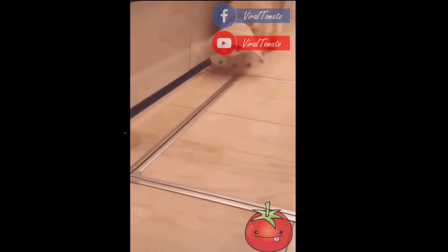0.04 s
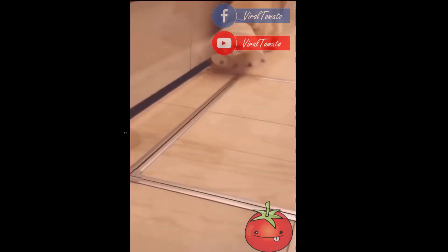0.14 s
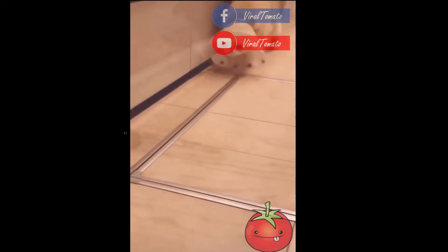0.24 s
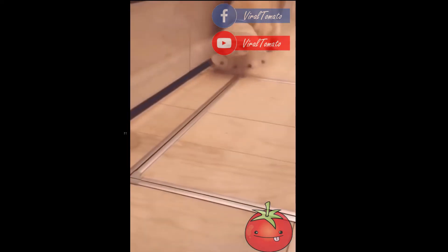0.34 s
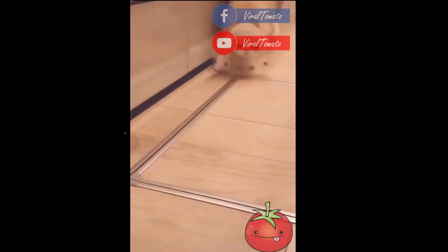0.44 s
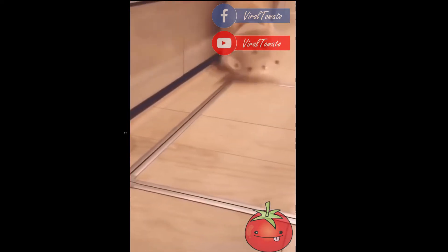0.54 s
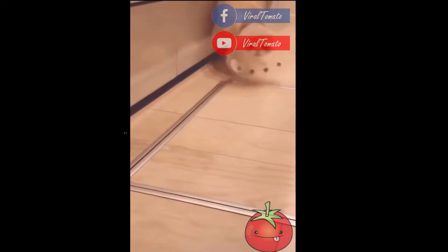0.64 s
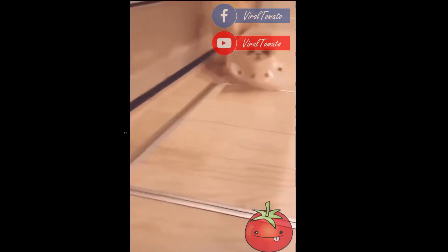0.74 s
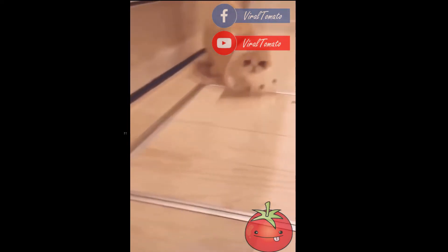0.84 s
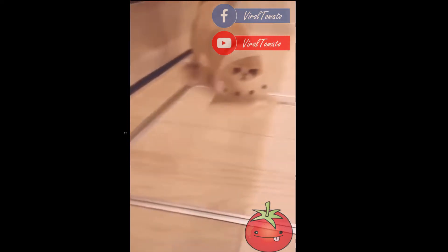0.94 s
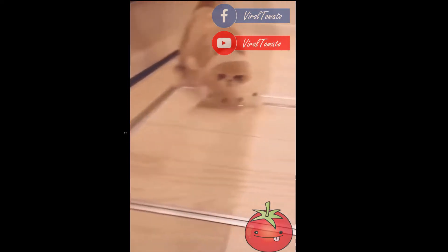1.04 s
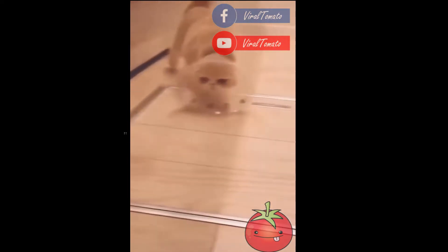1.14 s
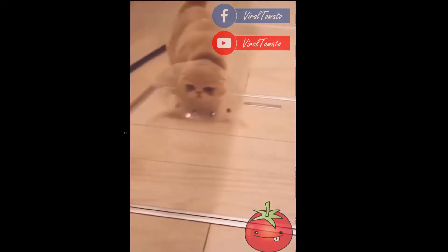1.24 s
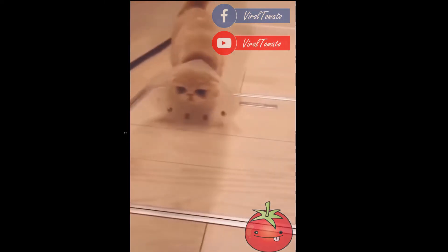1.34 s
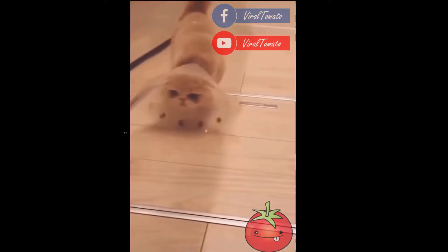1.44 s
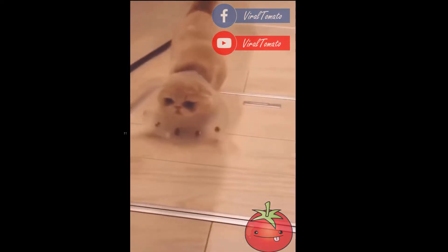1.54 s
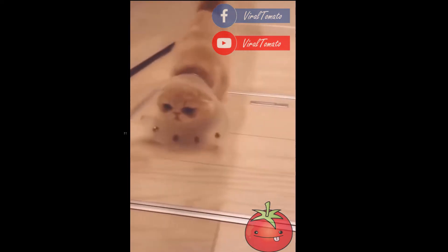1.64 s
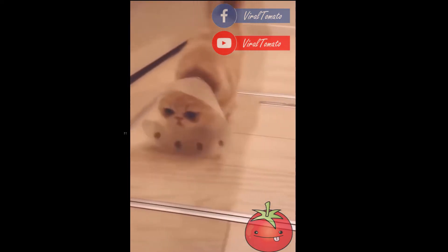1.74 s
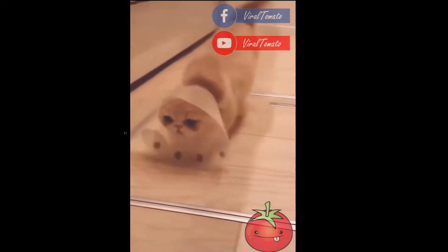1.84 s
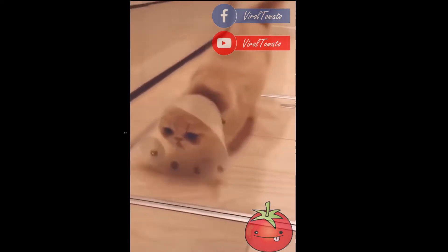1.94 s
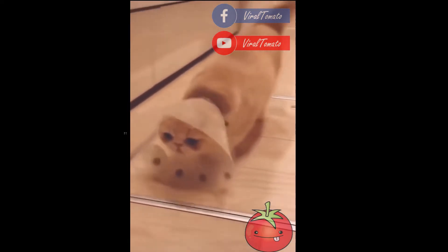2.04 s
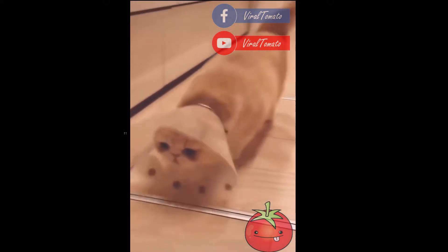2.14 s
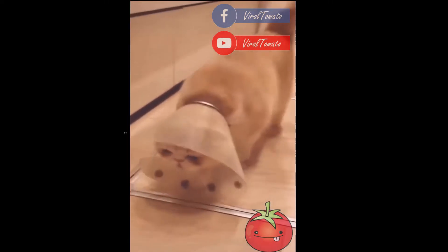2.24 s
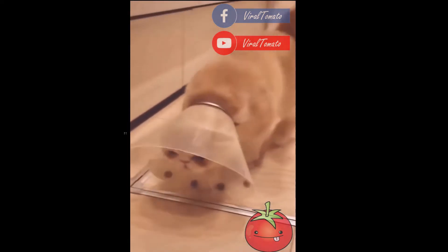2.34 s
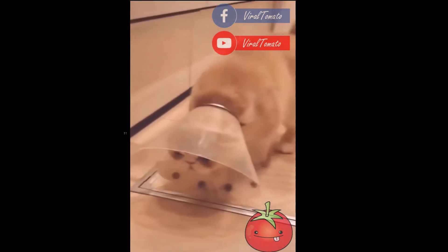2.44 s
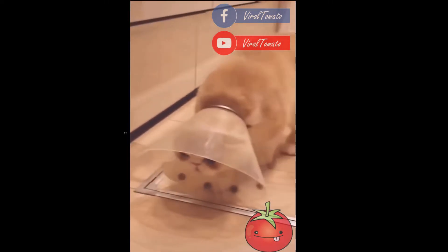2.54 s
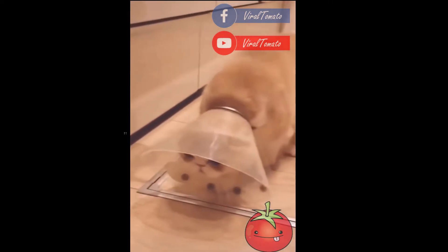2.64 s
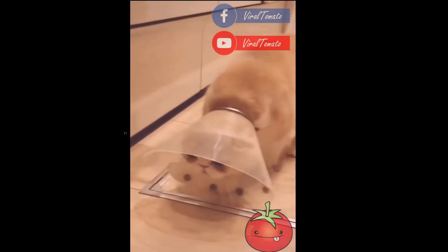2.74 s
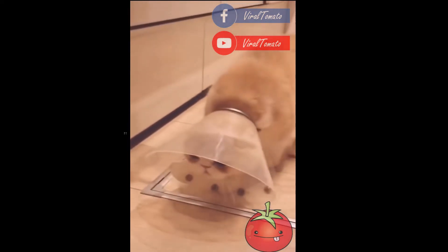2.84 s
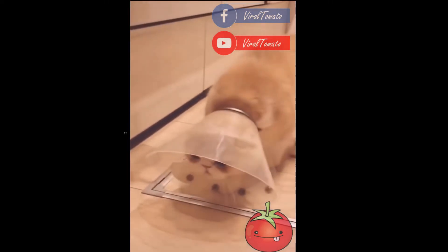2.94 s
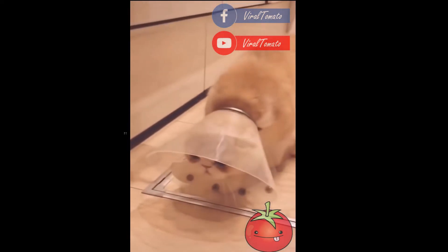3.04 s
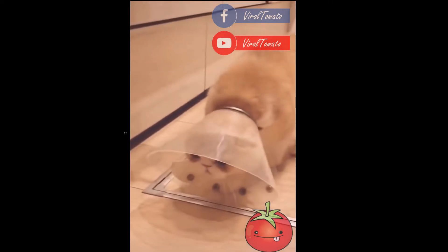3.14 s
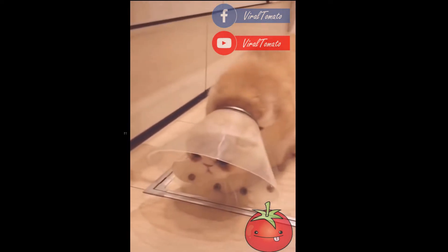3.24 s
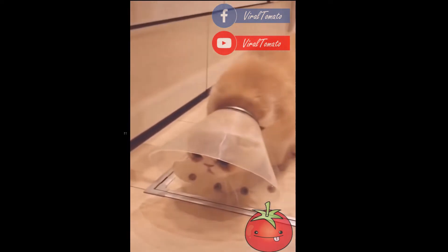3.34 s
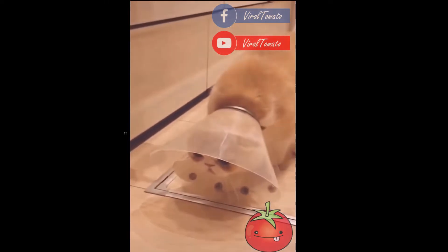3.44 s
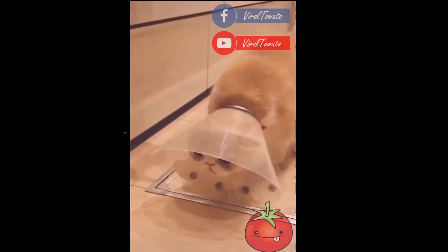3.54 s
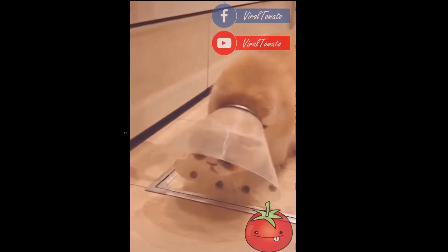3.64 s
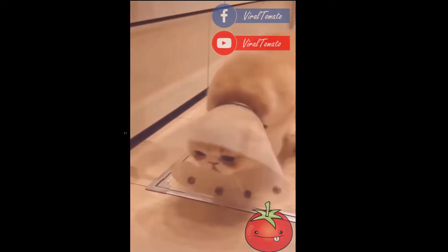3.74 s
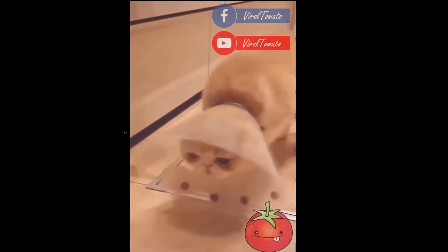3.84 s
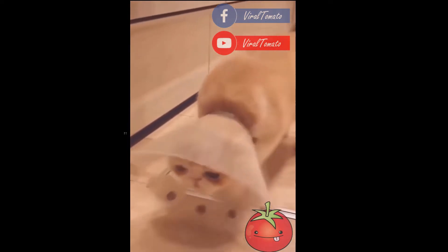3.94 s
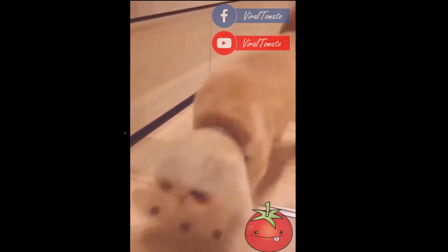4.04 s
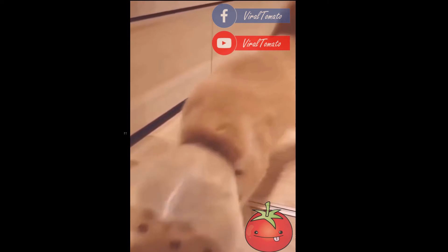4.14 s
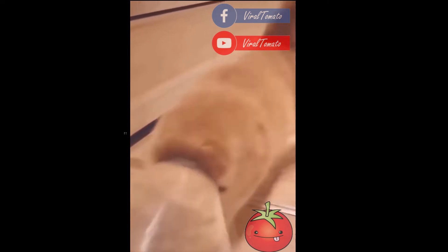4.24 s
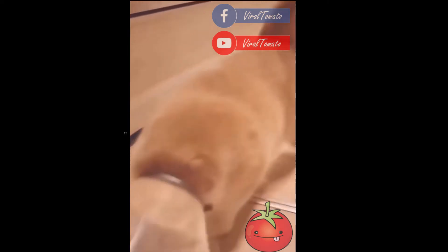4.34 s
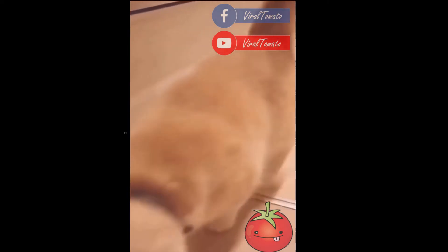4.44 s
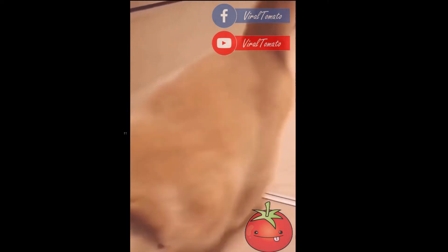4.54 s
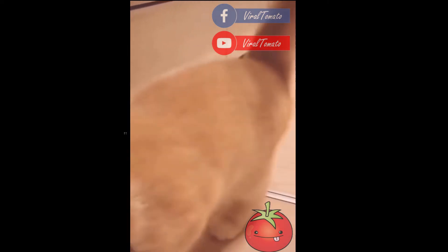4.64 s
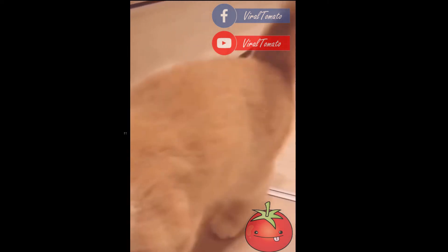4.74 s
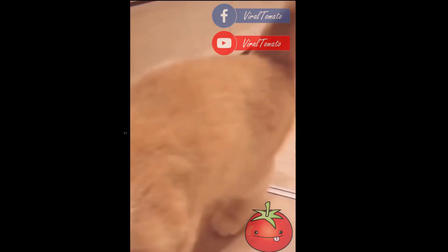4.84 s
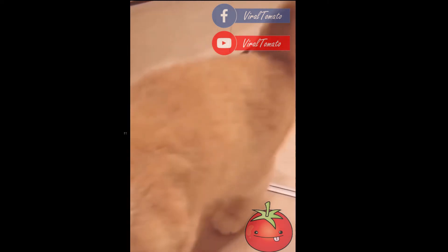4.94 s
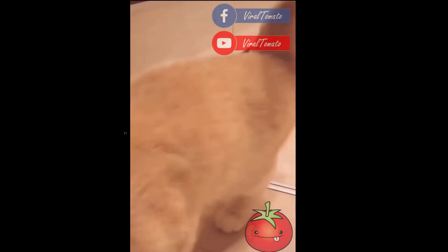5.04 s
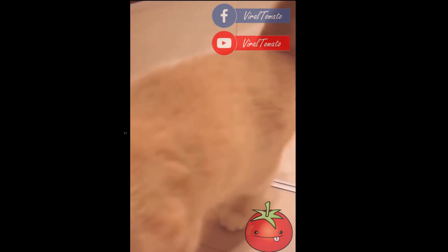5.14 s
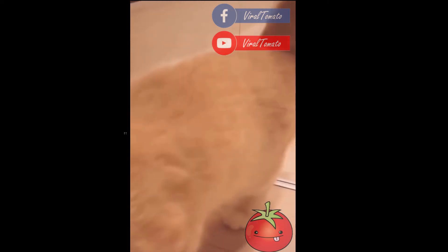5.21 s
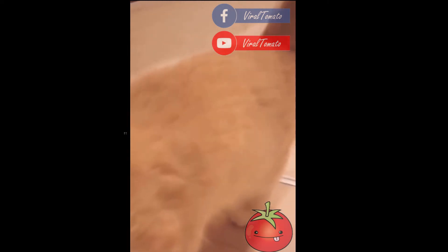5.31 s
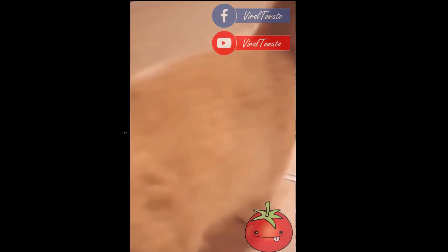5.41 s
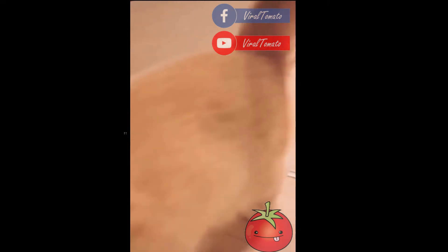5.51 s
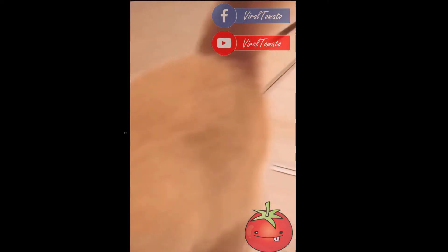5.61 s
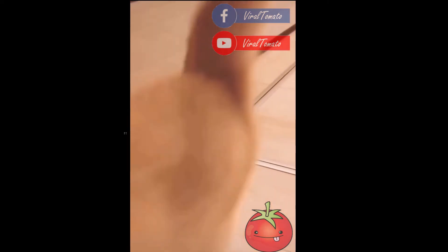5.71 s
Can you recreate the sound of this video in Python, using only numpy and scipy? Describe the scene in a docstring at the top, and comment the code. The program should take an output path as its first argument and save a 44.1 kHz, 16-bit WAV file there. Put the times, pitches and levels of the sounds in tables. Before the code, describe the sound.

Over faint room hum, thin plastic thumps loudly against tile joints, with dry ticking and raspy sliding between the blows.

```python
"""A faint hum, rumble and hiss are heard first, from filtered noise with a wavering sine whine. A cat in a
plastic cone collar walks over a tiled floor toward the listener: the fasteners tick (resonant noise bursts),
the rim knocks where it catches on a joint (dispersed bending-wave pulses and a clack), a paw thuds softly once,
and it slides on the tiles (patchy noise through the sheet's modes). A small hard room answers the collar with a
decaying noise tail."""
import sys
import numpy as np
from scipy import signal
from scipy.fft import rfft, irfft, next_fast_len
from scipy.io import wavfile
from scipy.ndimage import uniform_filter1d, map_coordinates

SR = 44100
rng = np.random.default_rng(int(sys.argv[2]) if len(sys.argv) > 2 else 0)


def output_pcm(signal):
    """Save a mono or channel-first signal as 16-bit PCM at the path in sys.argv[1].

    Samples are clipped to [-1, 1] before scaling.
    """
    pcm = np.clip(np.atleast_2d(signal).T, -1, 1) * 32767
    wavfile.write(sys.argv[1], SR, np.round(pcm).astype(np.int16))


N = 254456

# Reverberation of the small hard room: (f/Hz, decay time t60/s)
ROOM_DECAY = [(100, 0.32), (300, 0.25), (800, .25), (2000, .25), (10000, 0.18)]
# Room tone spectrum: (f/Hz, relative density/dB per Hz)
AIR_SPECTRUM = [(26, -17.5), (45, -8), (86, -1.5), (165, -2), (372, -8.5), (400, -11), (560, -13),
                (647, -13), (928, -21), (1020, -20), (4420, -32), (6040, -35), (14000, -39.5)]
# Room tone through time: (t/s, level/dB)
AIR_LEVEL = [(0, -52), (.13, -59), (.5, -60.5), (1.05, -59.5), (1.2, -56.5), (1.35, -59), (2.7, -58.5),
             (3.2, -61.5), (4.3, -61.5), (4.9, -61.5), (5.1, -68), (5.77, -73)]
# Wavering hum tones: (f/Hz, width/Hz, level over the rumble/dB)
HUM_TONES = [(59.6, 3.1, -8.5), (179, 14, -14.5), (419, 16, -15.5), (659.6, 55, -13.5)]
# Fastener ticks: (t/s, peak level before the room/dB, spectral tilt/dB per octave)
TICKS = [(0.0827, -44.5, -6), (0.099, -40, -5.5), (0.3398, -45, -7), (0.3514, -51, -4.5),
         (0.623, -49.5, -4), (0.6577, -47.5, -6), (0.706, -51, -5), (0.9378, -54.5, -5.5),
         (1.061, -48, -10), (1.1413, -28, -8.5), (1.3532, -33, -7), (1.7195, -24, -9), (2.4804, -34, -4.5),
         (2.5165, -33, -3.5), (2.5324, -29, -5.5), (3.9828, -35.5, -4), (3.9914, -49.5, -3.5),
         (4.0337, -44.5, -4), (4.2431, -35.5, -3), (4.397, -34.5, -4.5), (4.4049, -25.5, -5),
         (4.4283, -37, -7), (4.515, -24, -7), (4.8294, -36.5, 1.5), (4.844, -44, -3), (4.8674, -51, 3),
         (4.894, -34, 3), (4.9086, -36.5, -4.5), (4.9355, -38, -4), (4.9705, -38, -5), (5.3165, -54, -2),
         (5.3319, -30.5, -9), (5.343, -35.5, -6), (5.375, -55, 1), (5.4147, -50.5, -10), (5.4778, -58, -7)]
# Ticks smear less as the cat comes near: (t/s, decay time t60/s)
TICK_DECAY = [(0, .045), (2.5, .018)]
# Resonances of the fastener studs: (f/Hz, width/Hz, level/dB)
STUD_MODES = [(1780, 2200, -13.5), (3970, 730, 1.5), (5500, 2400, -3), (7950, 990, 3), (12050, 2500, -3)]
# Rim knocks, and a soft paw thud at 5.093 s: (t/s, thump peak level/dB, clack over thump/dB, body pitch ratio
# with 1 = usual,
KNOCKS = [(0.297, -50.5, -4, 0.94, -16, -19), (0.422, -45.5, -25, 0.74, -10, -8),
          (0.697, -42.5, -7, 1.02, 8, -3), (1.066, -51, 3, 1.23, -10, -13), (1.142, -27, 0, 1.09, 13, -7),
          (1.356, -37, -13, 1.3, -29, -5), (1.722, -26.5, -3.5, 1.42, 12, -5),
          (2.103, -45, 14.5, 0.92, -3, -6.5), (2.429, -1.5, -3, 0.82, -6.5, -10),
          (3.943, -38.5, 4, 0.86, 7, -11), (3.948, -25, -7, 1.04, 12.5, -11),
          (3.978, -45, -12.5, 1.1, -9.5, -3), (4.369, -35, 5, 1.2, -1.5, -6),
          (4.4422, -12.5, -12, 1.9, -12, -10), (4.4436, -8, -12, 0.96, -12, 4),
          (4.798, -10.5, -6, 0.88, -8, -9), (4.816, -17.5, -33, 0.82, -33, -7),
          (5.093, -56, -30, 0.53, -12, -12), (5.274, -42.5, -14, 0.6, -1.5, -7),
          (5.322, -45, -12, 1.03, 3, -5), (5.334, -38.5, -4, 1.13, -5.5, -5),
          (5.339, -30.5, 0.5, 1.08, 5, 6), (5.365, -49.5, -8, 1.17, 2, 2)]
# Spectrum of the cone's thump at pitch ratio 1: (f/Hz, relative density/dB per Hz)
BODY_SPECTRUM = [(40, -40.5), (75, -18), (110, -3.5), (200, -0.5), (330, 1), (600, 0), (900, -6),
                 (1300, -18), (2000, -31), (4000, -66)]
# Resonances of the rim's clack: (f/Hz, width/Hz, level/dB)
EDGE_MODES = [(1450, 1300, -5), (2150, 500, 1), (3000, 600, -5.5), (4500, 1100, -12.5), (8400, 710, -26)]
# Later arrivals of the bending wave: (path/laps round the cone, level before scatter and lap loss/dB)
LAP_ARRIVALS = [(1.01, -7), (1.32, -11), (1.95, -16.5), (2.4, -21), (3.049, -20.5), (4.2, -21)]
# Sheet resonances under the rim, four bands of a slide: (f/Hz, width/Hz, level/dB)
SCRAPE_MODES = [(1470, 300, -8.5), (1935, 360, -1), (2270, 460, -1.5), (2974, 550, -5)]
RASP_MODES = [(3370, 500, -0.23), (3958, 650, -0.77)]
WHISTLE_MODES = [(4400, 830, -0.67), (5210, 620, -1.8)]
GROWL_MODES = [(573, 130, 1.5), (790, 170, 3.5), (1149, 380, -2)]
# Grit on the glaze: (f/Hz, relative density/dB per Hz)
GRIT_SPECTRUM = [(3290, -31), (5600, -1.5), (7300, -4), (9620, -13.5), (12400, -12), (13400, -17.5),
                 (14000, -61.5)]
# Strokes of the rim, swelling with each step; per stroke, rows of (t/s, scrape level/dB, rasp over scrape/dB)
STROKES = [
    [(1.146, -46.5, -3), (1.25, -46, -7.5), (1.36, -51, -6), (1.45, -44.5, -7.5), (1.5, -45.5, -1),
     (1.6, -52, -5.5), (1.7, -45, -2.5), (1.78, -44.5, -2), (1.93, -51, -3), (2.04, -45, -8),
     (2.075, -50.5, -5), (2.091, -57, -1)],
    [(2.104, -47.5, -3), (2.13, -44, -7.5), (2.19, -45, -3), (2.27, -52, -2), (2.39, -42.5, -8.5),
     (2.428, -43, -4.5)],
    [(4.37, -42, -10), (4.395, -52.5, -5), (4.435, -40, -10), (4.47, -49, 0), (4.545, -44.5, 0),
     (4.565, -54, 5.5), (4.615, -53, 2), (4.69, -44.5, 2), (4.8, -54.5, 8.5), (4.86, -83, 18)],
    [(5.3, -78.5, 7), (5.322, -61, -5), (5.336, -44, -24), (5.37, -81, 9), (5.38, -74, 0)],
]
# Other bands per stroke, over its mean scrape level: (whistle level/dB, grit level/dB, growl level/dB)
STROKE_MIXES = [(-5.5, -6.5, -1.5), (-5.5, -8.5, -2), (-12.5, -7, -1.5), (-7.5, -14, -8)]
# How far each band follows the swells, 1 = fully: (whistle, grit, growl)
FOLLOWS = (0.58, 1, .3)
# Skid after a knock, bands over the scrape: (rasp level/dB, whistle level/dB, grit level/dB, growl level/dB)
SKID_MIX = (-2.5, -5, -1, 3)

HIGH_DB, WHINE_HZ = -8, 5940  # hiss over rumble; mean frequency of the whine
LAP_S = .0094  # travel time of a bending wave once round the cone
WANDER_DB, WANDER_RATE = -1, 12  # independent drift of whistle, grit and growl; knots per second
SKID_DB, SKID_FADE_DB_PER_S = -35.5, 191.5  # skid scrape over the knock's thump; its fade
LAND_S, LIFT_S = .0016, .008  # the rim lands at once and lifts off more gently
TOP_HZ = 14357  # upper band limit


def amp(db):
    """Logarithmic level: decibels become an amplitude ratio."""
    return 10 ** (np.asarray(db) / 20)


def unit(x):
    """Normalisation: scales x to unit rms."""
    return x / np.sqrt(np.mean(x ** 2) + 1e-20)


def along(points, hz):
    """Logarithmic pitch scale: interpolates (f/Hz, value) points over log frequency."""
    f, v = np.transpose(points)
    return np.interp(np.log(hz + 1), np.log(f + 1), v)


def curves(rows):
    """Envelope interpolation: one value per sample for each column after the time."""
    s, *cols = np.transpose(rows)
    return [np.interp(np.arange(N) / SR, s, c) for c in cols]


def wobble(rate):
    """Slow random modulation: a smooth curve through random knots, rate knots per second."""
    knots = rng.standard_normal(int(N * rate / SR) + 4)
    return map_coordinates(knots, [np.arange(N) * rate / SR])


def filtered(x, response):
    """Linear filtering: the spectrum of x times a complex response of frequency."""
    m = next_fast_len(len(x) + 8192)
    return irfft(rfft(x, m) * response(np.fft.rfftfreq(m, 1 / SR)), m)[:len(x)]


def modes(table, f):
    """Modal superposition: causal resonances (f/Hz, width/Hz, level/dB) summed with alternating sign."""
    return sum((-1) ** k * amp(db) * 1j * f * w / (c * c - f * f + 1j * f * w)
               for k, (c, w, db) in enumerate(table))


def patchy(depth_db, size=512, count=5):
    """Intermittent noise: its strength varies in random patches of time and frequency."""
    z = signal.stft(rng.standard_normal(N), nperseg=size)[2]
    field = uniform_filter1d(rng.standard_normal(z.shape), size=count, axis=0)
    field = uniform_filter1d(field, size=12, axis=1)
    return signal.istft(z * amp(depth_db * unit(field)), nperseg=size)[1][:N]


def add(out, s, x):
    """Superposition: mixes x into out from time s."""
    part = out[max(round(s * SR), 0):][:len(x)]
    part += x[:len(part)]


def room(x):
    """Reverberation: each frequency decays at its own rate, with a new random answer at every call."""
    hz, t, z = signal.stft(rng.standard_normal(SR // 3), SR, nperseg=256)
    t60 = np.maximum(along(ROOM_DECAY, hz), .05)[:, None]
    tail = signal.istft(z * amp(-60 * t / t60), SR, nperseg=256)[1]
    delayed = np.pad(x, (round(.003 * SR), 0))  # the answer starts 3 ms late
    return signal.fftconvolve(delayed, tail / np.linalg.norm(tail))[:len(x)]


def room_tone():
    """Stationary noise and narrow resonance: rumble with wavering appliance tones, and hiss with a whine."""
    low_db, = curves(AIR_LEVEL)
    split = lambda f: 1 / (1 + (f / 1100) ** 4)  # share of power given to the rumble
    low = unit(filtered(patchy(depth_db=3.5), lambda f: amp(along(AIR_SPECTRUM, f)) * np.sqrt(split(f))))
    high = unit(filtered(patchy(depth_db=1.2), lambda f: amp(along(AIR_SPECTRUM, f)) * np.sqrt(1 - split(f))))
    hum = sum(amp(db) * unit(filtered(rng.standard_normal(N), lambda f: modes([(hz, w, 0)], f) ** 2))
              for hz, w, db in HUM_TONES)
    whine_hz = WHINE_HZ + 8 * wobble(40)
    whine = amp(1.5 * wobble(25)) * np.sin(2 * np.pi * np.cumsum(whine_hz) / SR)
    rumble = amp(low_db + 1.2 * wobble(8.0)) * (low + hum)
    return rumble + amp(low_db + HIGH_DB) * (high + amp(-17) * whine)


def ticks():
    """Resonant filtering: each tick is a short noise burst through the studs' resonances."""
    out, t = np.zeros(N), np.arange(SR // 4) / SR
    for s, db, tilt_db in TICKS:
        octaves = lambda f: np.log2(np.clip(f, 1500, None) / 6000)
        colour = lambda f: modes(STUD_MODES, f) * amp(tilt_db * octaves(f))
        t60 = max(np.interp(s, *np.transpose(TICK_DECAY)), .008)
        envelope = amp(-60 * t / t60) * (1 - np.exp(-t / 0.00069)) ** 2
        burst = filtered(rng.standard_normal(len(t)), colour) * envelope
        burst = amp(db) * burst / np.abs(burst).max()
        add(out, s, burst + amp(-11.5) * room(burst))
    return out


def bend(f, far):
    """Bending-wave dispersion: high pitch runs faster, so a pulse becomes a quick falling chirp."""
    phase = np.sqrt(f + 150) - np.sqrt(150) - f / (2 * np.sqrt(6000))  # no added delay at 5850 Hz
    return np.exp(-4j * np.pi * .13 * far * phase)


def knocks():
    """Impact and dispersion: a falling thump comes round the cone again, with a clack of the rim."""
    out, t = np.zeros(N), np.arange(SR // 3) / SR
    for s, db, clack_db, pitch, low_db, high_db in KNOCKS:
        scatter_db = rng.normal(0, 1.0, len(LAP_ARRIVALS))

        def laps(f, loss_db):
            """Circulating waves: the direct wave plus delayed, further dispersed arrivals."""
            return 1 + sum(amp(g + e + loss_db) * np.exp(-2j * np.pi * f * n * LAP_S) * bend(f, 0.029 * n)
                           for (n, g), e in zip(LAP_ARRIVALS, scatter_db))

        rings = [(640 * pitch, 130, low_db), (1150 * pitch, 300, high_db)]
        body = lambda f: amp(along(BODY_SPECTRUM, f / pitch)) * (1.0 + modes(rings, f))
        impulse = 1. * (t == 0)
        thump = filtered(impulse, lambda f: body(f) * bend(f, 1 / np.sqrt(pitch)) * laps(f, loss_db=-3.0))
        chatter = amp(-60 * t / .012) * rng.standard_normal(len(t))  # the rim meets the tile at many points
        clack = filtered(chatter, lambda f: modes(EDGE_MODES, f) * laps(f, loss_db=-10))
        both = thump / np.abs(thump).max() + amp(clack_db) * clack / np.abs(clack).max()
        add(out, s, amp(db) * (both + amp(-13.5) * room(both)))
    return out


def slides():
    """Friction excitation: dense grit drives the sheet's modes, their balance shifting as contact wanders."""
    grit = amp(0.7 * wobble(150) + 1.1 * wobble(30))
    rub = lambda colour: unit(filtered(grit * patchy(depth_db=3.0, size=1024, count=3), colour))
    # a broad resonance at each table's second mode narrows the band
    scrape, rasp, whistle = [rub(lambda f: modes(table, f) * modes([(table[1][0], 3500, 0)], f))
                             for table in (SCRAPE_MODES, RASP_MODES, WHISTLE_MODES)]
    hiss = unit(filtered(grit * patchy(depth_db=3.5), lambda f: amp(along(GRIT_SPECTRUM, f))))
    growl = rub(lambda f: modes(GROWL_MODES, f) / (1 + (480 / (f + 1)) ** 4))
    others = np.array([x * amp(WANDER_DB * wobble(WANDER_RATE)) for x in (whistle, hiss, growl)])
    out, t = np.zeros(N), np.arange(N) / SR
    for stroke, mix_db in zip(STROKES, STROKE_MIXES):
        db, rasp_db = curves(stroke)
        start, end = stroke[0][0], stroke[-1][0]
        mean_db = db[(t > start) & (t < end)].mean()
        touch = np.clip(np.minimum((t - start) / LAND_S, (end - t) / LIFT_S) + 1, 0, 1)
        others_db = mean_db + np.array(mix_db)[:, None] + np.outer(FOLLOWS, db - mean_db)
        main = amp(db) * (scrape + amp(rasp_db) * rasp)
        out += touch * (main + (amp(others_db) * others).sum(axis=0))
    # the rim skids on after each knock
    skid = sum((t > s) * amp(db + SKID_DB - SKID_FADE_DB_PER_S * np.abs(t - s)) for s, db, *_ in KNOCKS)
    out += skid * (scrape + amp(SKID_MIX) @ [rasp, *others])
    return out + amp(-15.5) * room(out)


def scene():
    """Superposition of sources: the room tone and the collar's ticks, knocks and slides."""
    return (room_tone() + ticks() + knocks() + slides())[None]


def record(dry):
    """Band limiting: the treble fades steeply above 13 kHz and nothing remains from TOP_HZ up."""
    fade = [(13150, -2.5), (13300, -37)]  # (f/Hz, level/dB)
    return filtered(dry[0], lambda hz: (hz < TOP_HZ) * amp(along(fade, hz)))[None]


dry = scene()
out = record(dry)
output_pcm(out)
```